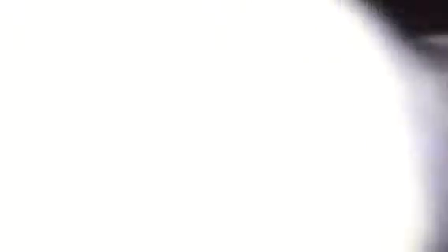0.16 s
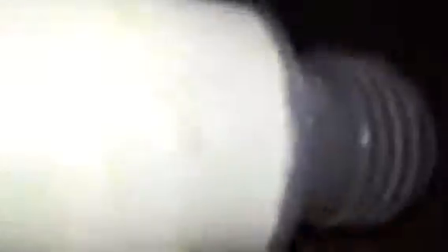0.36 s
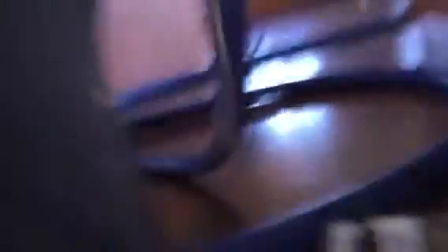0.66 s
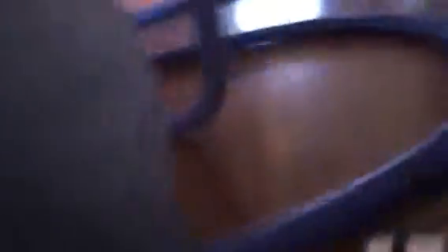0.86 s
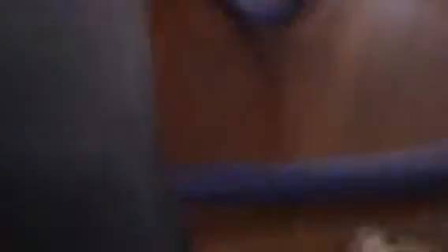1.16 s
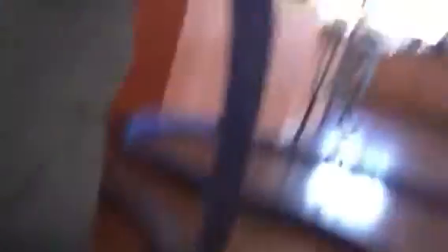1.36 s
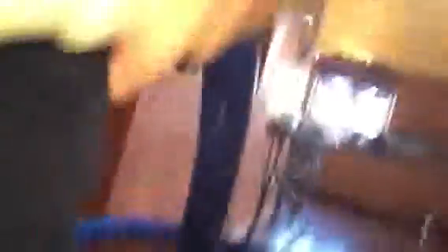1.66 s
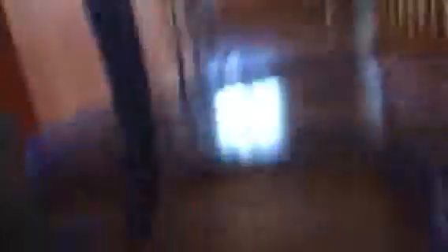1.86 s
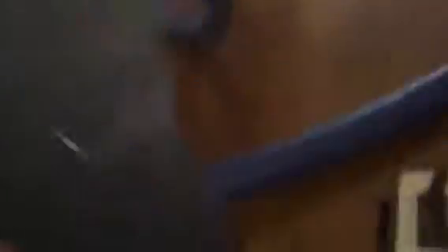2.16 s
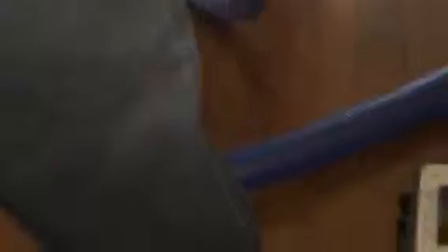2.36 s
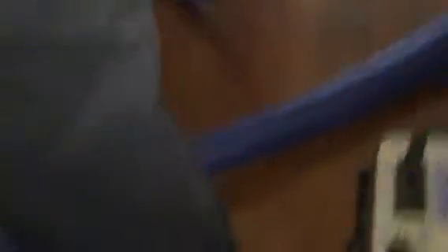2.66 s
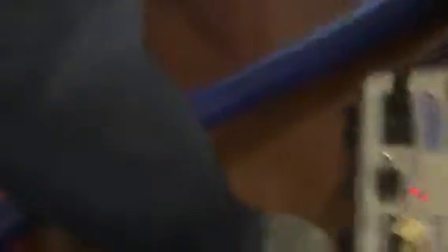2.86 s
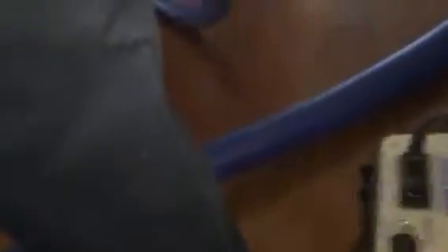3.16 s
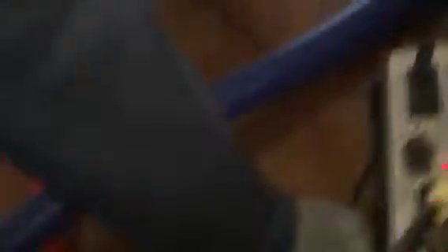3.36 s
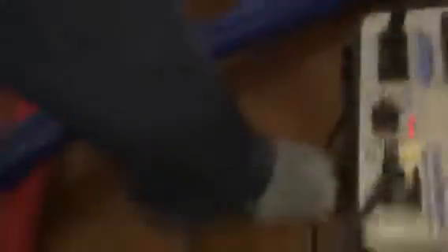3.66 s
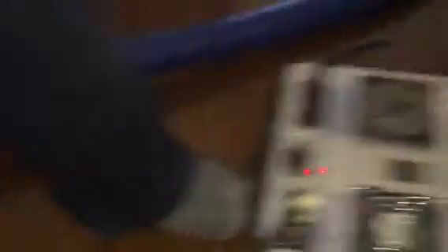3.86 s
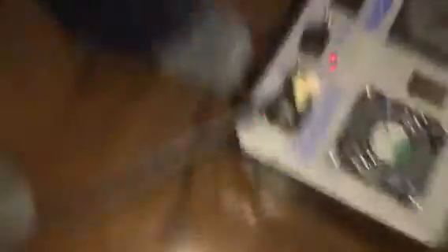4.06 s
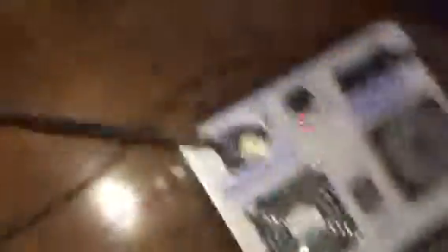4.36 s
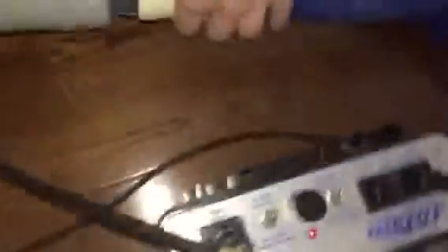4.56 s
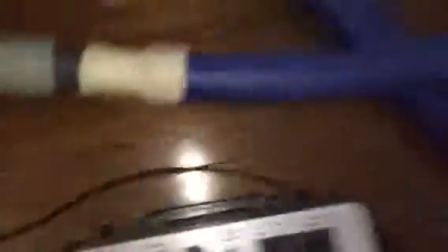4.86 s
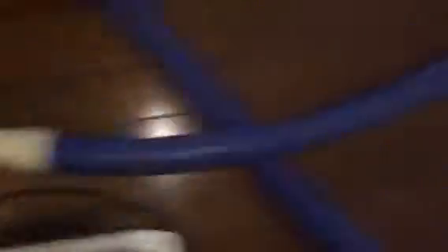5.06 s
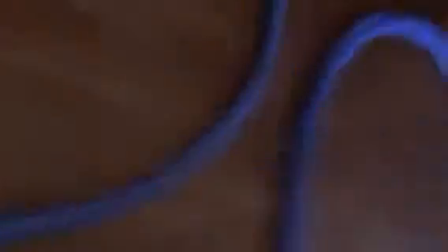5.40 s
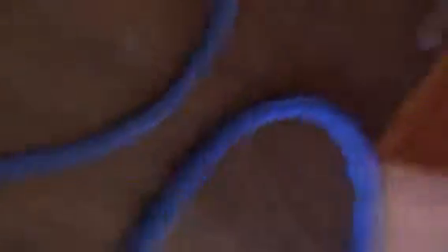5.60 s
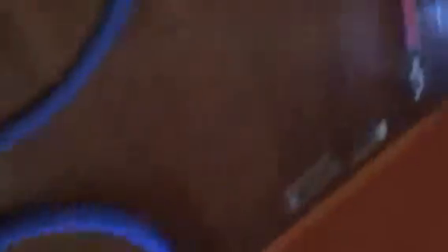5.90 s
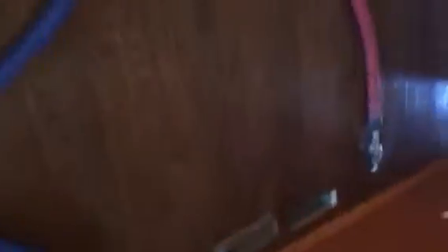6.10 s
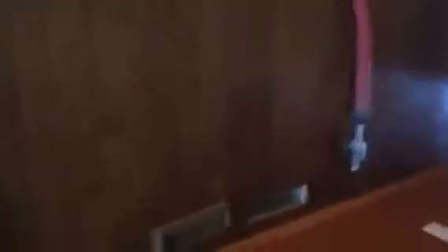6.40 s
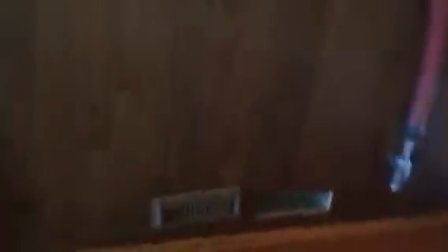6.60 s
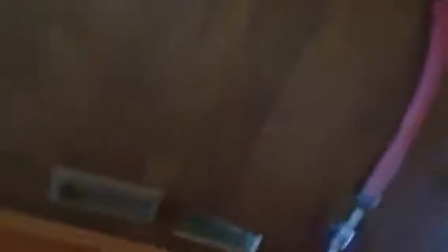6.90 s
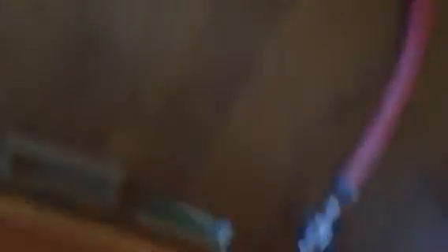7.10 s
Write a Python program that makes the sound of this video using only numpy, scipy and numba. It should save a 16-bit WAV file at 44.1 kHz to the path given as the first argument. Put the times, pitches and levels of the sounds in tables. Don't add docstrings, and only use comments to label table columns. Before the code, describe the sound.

Indoors, handheld and close: turbulent suction air swells and shifts in tone, with a soft bump before a sharp whistle and heavy clap seal the hose. The level ducks briefly, then a droning blower and duller room-wide air rush remain. A foot strikes the hollow wooden floor, a fainter step follows, and the rush grows closer and louder at a floor vent, coloured by a short reflection.

```python
import sys
import numpy as np
from scipy import signal
from scipy.fft import rfft, irfft
from scipy.io import wavfile
from scipy.ndimage import uniform_filter1d
from numba import njit

SR = 44100
rng = np.random.default_rng(int(sys.argv[2]) if len(sys.argv) > 2 else 0)


def to_wav(sig):
    pcm = np.clip(np.atleast_2d(sig), -1, 1) * 32767
    pcm = np.round(pcm).astype(np.int16)
    wavfile.write(sys.argv[1], SR, pcm.T)


def ratio(d):
    e = np.asarray(d, float) / 20
    return 10 ** e


N = 319284
TIME = np.arange(N) / SR
SHUT_S = 1.647
BEFORE_SHUT = np.arange(N) < SHUT_S * SR
AFTER_SHUT = np.arange(N) > SHUT_S * SR


def curve(table):
    s, *columns = np.transpose(table)
    return [np.interp(TIME, s, column) for column in columns]


def bump(s, length):
    return np.exp(-((TIME - s) / length) ** 2)


def walk(rate):
    k = int(SR / rate)
    held = np.repeat(rng.standard_normal(N // k + 1), k)
    return 1.3 * uniform_filter1d(uniform_filter1d(held, k), k)[:N]


def unit(x, lo_hz=20, hi_hz=20000):
    part = signal.sosfilt(signal.butter(4, [lo_hz, hi_hz], "band", fs=SR, output="sos"), x)
    return x / np.sqrt(np.mean(part ** 2))


@njit
def svf(x, hz, width):
    y, b, l = np.empty(len(x)), 0., 0.
    for i in range(len(x)):
        g, k = np.tan(np.pi * hz[i] / SR), width[i] / hz[i]
        v = (b + g * (x[i] - l)) / (1 + g * (g + k))
        b, l, y[i] = 2 * v - b, l + 2 * g * v, k * v
    return y


def band(x, hz, width):
    return svf(x, hz + np.zeros(N), width + np.zeros(N))


def steep_noise(hz, width):
    return unit(band(band(rng.standard_normal(N), hz, width), hz, width))


def air(colour, treble_db=0, body_db=0, flicker_db=.5):
    hz = np.fft.rfftfreq(N, 1 / SR) + 1
    points_hz, points_db = np.transpose(colour)
    colour_db = np.interp(np.log(hz), np.log(points_hz), points_db)
    spectrum = rfft(rng.standard_normal(N)) * ratio(colour_db)
    out = 0
    for centre in 25 * 2 ** np.arange(0, 9.6, .5):
        window = np.cos(np.pi * np.clip(np.log2(hz / centre), -.5, .5)) ** 2
        top, low = np.clip(np.log2([centre / 4500, 2200 / centre]), 0, 1)
        level_db = flicker_db * walk(6) + top * treble_db + low * body_db
        out = out + irfft(spectrum * window, N) * ratio(level_db)
    return out


def echo(x, ms, strength, top_hz=9000):
    dull = signal.sosfiltfilt(signal.butter(2, top_hz, fs=SR, output="sos"), x)
    late = np.interp(np.abs(np.arange(N) - ms * SR / 1000), np.arange(N), dull)
    return (x + strength * late) / np.sqrt(1 + strength ** 2)


def duck():
    duck_db, step_db, hold_until_s, recover_s = -8, 5, 1.845, 0.11
    creep = (duck_db + step_db) * np.exp(-np.clip(TIME - hold_until_s, 0, None) / recover_s)
    db = np.where(TIME < hold_until_s, duck_db, creep) * (TIME > SHUT_S)
    return uniform_filter1d(db, size=1300)


# time in seconds, level in dB, treble won or lost by the aim in dB.
HOSE_LEVEL = [(0, -27.5, 0.5), (.2, -26.5, -1.5), (.4, -27, 2.5), (.6, -25, 0), (.8, -25, 1),
              (.92, -22, 0.5), (1.15, -24, -.5), (1.5, -25, 0), (1.55, -24.5, -7)]
# pitch in Hz, strength in dB per Hz.
HOSE_COLOUR = [(240, -28), (400, -14.5), (783, -13), (1470, -6), (1730, -2), (2080, -3), (2460, -2),
               (3240, -2), (4200, 0), (4900, -8.5), (6650, -2.5), (9020, -5), (10500, -7.5), (14500, -4),
               (15400, -4.5)]
# time in seconds, pitch in Hz, level in dB.
RIM = [(0, 6250, -28), (.1, 7600, -28.5), (.22, 9400, -26), (.32, 8000, -32), (.42, 6060, -24.5),
       (.5, 5860, -30), (.6, 5500, -52)]
# time in seconds, echo delay in ms, echo strength from 0 to 1.
HAND = [(0, .54, .72), (.15, .49, .62), (.3, .45, .62), (.4, .5, .68), (.5, 0.52, .4), (.62, 0.36, .1),
        (1.12, 0.42, 0.12), (1.4, .43, .3), (1.6, 0.3, 0.13)]
# pitch in Hz, width in Hz, lift as a share.
MOUTH = [(1800, 180, 0.2), (2400, 180, 0.42), (4310, 230, 0.65), (5680, 310, 0.3)]


def hose():
    db, aim_db = curve(HOSE_LEVEL)
    ms, hand = curve(HAND)
    body_db = 8.5 - 1.26 * (db - db[0])
    body_db = body_db + 7.5 * bump(SHUT_S, 0.11)
    body_db = body_db - 12 * AFTER_SHUT
    treble_db = aim_db + 0.74 * walk(6.45)
    rush = unit(air(HOSE_COLOUR, treble_db, body_db), 1350, 4930) * ratio(db)
    rush = echo(rush, ms, np.clip(hand, 0, 1), top_hz=4500)
    rush = rush + sum(lift * band(rush, hz, width) for hz, width, lift in MOUTH)
    rush = rush - np.clip(0.95 * hand, 0, 1) * band(rush, 616, 370)
    rim_hz, rim_db = curve(RIM)
    glint = unit(band(rng.standard_normal(N), rim_hz, 900))
    rush = rush + glint * ratio(rim_db) * (rim_db > rim_db[-1])
    after = np.clip(TIME - SHUT_S, 0, None)
    t60_s = 0.082
    return rush * ratio(-7.5 * (after > 0) - 60 * after / t60_s)


# time in seconds, level in dB.
RUMBLE_LEVEL = [(0, -39.5), (.38, -37), (1, -42), (1.43, -37.5), (1.93, -43.5), (2.44, -41.5), (2.92, -44),
                (4.3, -40), (5.36, -45), (5.7, -49.5), (7.24, -49.5)]
# pitch in Hz, strength in dB per Hz.
RUMBLE_COLOUR = [(15, -66), (25, -36), (35, -57), (45, -9), (92, -2), (108, -0.5), (134, -4), (184, -5),
                 (214, -3.5), (265, -1), (332, -10), (420, -8.5), (550, -26.5), (920, -120)]
# pitch in Hz, rms level in dB, wander in Hz.
BLOWER_TONES = [
    (270.5, -52, 2.15),
    (1016, -55, 2.4),
]


def blower():
    db, = curve(RUMBLE_LEVEL)
    tones = 0
    for hz, tone_db, wander_hz in BLOWER_TONES:
        hidden_db = -6 * (hz > 500) * BEFORE_SHUT
        level = ratio(tone_db + 2.2 * walk(8) + hidden_db)
        phase = 2 * np.pi * np.cumsum(hz + wander_hz * walk(14)) / SR
        tones = tones + level * np.sin(phase)
    near = ratio(0.57 * (db - db[3 * SR]))
    rumble = unit(air(RUMBLE_COLOUR, flicker_db=0.7)) * ratio(db + 1.5)
    return (rumble + np.sqrt(2) * tones * near) * ratio(0.68 + 0.53 * duck())


# time in seconds, level in dB, treble won or lost by the aim in dB.
RUSH_LEVEL = [(2, -33.5, -0.5), (2.7, -33, 0.5), (3, -33.5, 1), (3.7, -33.5, 1), (4.35, -33.5, 1),
              (4.65, -34.5, 0), (4.9, -33, -2), (5.25, -31.8, -1.5), (5.5, -29.8, -1.5), (5.7, -30.5, -1),
              (5.9, -29, -.5), (6.3, -29.5, 2), (6.9, -29, 2.5), (7.24, -26.5, 1)]
# pitch in Hz, strength in dB per Hz.
ROOM_COLOUR = [(180, -35), (300, -23), (476, -13), (640, -3), (743, -8.5), (1050, -5.5), (1200, -8),
               (1580, -6), (2280, -4), (2470, -6.5), (4470, -5.5), (5020, -8), (5640, -5.5), (13500, -16),
               (15400, -18.5)]
# pitch in Hz, strength in dB per Hz.
VENT_COLOUR = [(180, -56), (300, -64), (424, -30), (453, -30), (484, -17.5), (580, -13), (662, -8.5),
               (935, -2.5), (1440, -6), (1900, -4.5), (5020, -7), (6760, -4.5), (15400, -16)]
# time in seconds, vent share from 0 to 1, floor echo delay in ms, echo strength from 0 to 1.
APPROACH = [(4.5, .01, 1.8, 0.3), (4.95, .3, 1.3, 0.26), (5.3, 0.8, 1.12, 0.3), (6.0, 0.94, 1.02, 0.22),
            (6.85, 0.97, 1.04, 0.3), (7.0, 0.97, 1.015, .36), (7.24, 0.96, 0.91, 0.36)]


def room_and_vent():
    db, facing_db = curve(RUSH_LEVEL)
    duck_db = duck()
    treble_db = facing_db + 0.41 * duck_db
    body_db = 0.53 * facing_db - 0.11 * duck_db
    share, ms, strength = curve(APPROACH)
    share = np.clip(share, 0, 1)
    room = unit(air(ROOM_COLOUR, treble_db + .6, body_db + .8), 720, 6300)
    vent = unit(air(VENT_COLOUR, treble_db - 1.0, body_db - 2.0), 700, 6600)
    vent = echo(vent, ms, np.clip(strength, 0, 1), top_hz=10700)
    mix = np.sqrt(1 - share) * room + np.sqrt(share) * vent
    return mix * ratio(db + duck_db - 11 * BEFORE_SHUT)


# echo delay in ms, strength from 0 to 1, drift in ms.
NEARBY = [(2.1, 0.12, 0.28), (3.7, 0.1, 0.312), (5.9, 0.17, 0.386)]


def nearby(x):
    for ms, strength, drift_ms in NEARBY:
        x = echo(x, ms + drift_ms * walk(1.5), strength, top_hz=12200)
    return x


# time in seconds, length in seconds,
# extra depth of the lower dip, extra depth of the upper dip, pitch of the lower dip in Hz.
TURNS = [(.205, .035, .6, .3, 4880), (.24, 0.12, .2, .3, 4950), (.275, .04, .15, .35, 5000),
         (.38, .04, .3, -.1, 5250), (.58, .08, 0.11, 0.12, 5000), (1.298, 0.055, .65, .1, 4900),
         (1.45, .12, .15, 0.38, 5150)]
# pitch in Hz, width in Hz, depth from 0 to 1.
MIDDLE_DIP = (7550, 800, 0.32)


def shadow(x):
    usual_hz = 5020
    dip_hz, dip, upper_dip = usual_hz, 0.25, 0.35
    for s, length, lower, upper, hz in TURNS:
        away = bump(s, length)
        dip_hz = dip_hz + (hz - usual_hz) * away
        dip = dip + lower * away
        upper_dip = upper_dip + upper * away
    for _ in range(2):
        x = x - np.clip(dip, 0, 1) ** 1.25 * band(x, dip_hz, 310)
        x = x - np.clip(upper_dip, 0, 1) ** 1.35 * band(x, 10460, 1000)
    hz, width, depth = MIDDLE_DIP
    return x - depth * band(x, hz, width)


# time in seconds, level in dB, pitch in Hz, time to fade by 60 dB in seconds.
KNOCKS = [
    (1.262, -24, 227, 0.18),
    (1.653, -15.5, 82, 0.16),
    (4.349, -29, 170, 0.64),
    (4.372, -26.5, 125, 0.7),
    (5.455, -31, 103, 0.47),
    (7.12, -38, 48, .25),
]
# time in seconds, level in dB, pitch in Hz.
TICKS = [
    (1.653, -19, 248),
    (4.348, -20.5, 1750),
    (4.349, -28, 500),
    (5.455, -36, 400),
]


def knocks():
    out, t = np.zeros(N + SR), np.arange(SR) / SR
    for s, db, hz, t60 in KNOCKS:
        start = int(s * SR)
        sag = np.sin(2 * np.pi * hz * (t + 0.0101 * (1 - np.exp(-t / 0.014))))
        rough = steep_noise(hz, 0.78 * hz)[:SR] * (1 - np.exp(-t / 0.0056))
        boom = sag * ratio(-90 * t / t60) + 0.58 * rough
        out[start:start + SR] += boom * ratio(db - 60 * t / t60)
    for s, db, hz in TICKS:
        start = int(s * SR)
        out[start:start + SR] += steep_noise(hz, 0.6 * hz)[:SR] * ratio(db - 60 * t / 0.035)
    return out[:N]


# time in seconds, pitch in Hz, jet level in dB.
GAP = [(1.48, 2300, -43), (1.55, 2010, -24.5), (1.6, 1930, -18), (1.636, 3140, -18), (1.643, 4030, -9.5),
       (1.649, 4070, -22), (1.676, 4200, -29), (1.69, 4190, -43), (1.8, 4150, -64)]


def gap():
    step_hz, upper_db, q = 1350, -3, 4.2
    hz, spit_db = curve(GAP)
    squeal_db = 5 * bump(1.643, 0.0033)
    db = spit_db + squeal_db - 6 * AFTER_SHUT
    jet = rng.standard_normal(N)
    low, high = (unit(band(band(jet, f, f / q), f, f / q)) for f in (hz, hz + step_hz))
    spit = unit(band(rng.standard_normal(N), 1.3 * hz, 9000)) * ratio(spit_db)
    song = (low + ratio(upper_db) * high) * ratio(db)
    return (song + spit) * (TIME > GAP[0][0]) * (TIME < GAP[-1][0])


# pitch in Hz, width in Hz, level in dB, loudest at and lasting, in seconds.
LEAK = (5620, 170, -47, 2.45, .7)


def leak():
    hz, width, db, s, length = LEAK
    return steep_noise(hz, width) * ratio(db + 1.5 * walk(6)) * bump(s, length)


def scene():
    mono = shadow(nearby(hose() + room_and_vent())) + gap() + leak() + blower() + knocks()
    return np.array([mono, mono])


def spectral_holes(x):
    top_hz = 15290
    window = np.sin(np.pi * (np.arange(2048) + .5) / 2048)
    hz, _, z = signal.stft(x, SR, window, nperseg=2048, noverlap=1024)
    cell = uniform_filter1d(np.abs(z) ** 2, size=7, axis=0)
    mask = uniform_filter1d(cell, size=90, axis=0)
    limit_db = -6.9 + 4.0 * np.log2((hz + 1) / 10000)
    quiet_db = np.clip(10 * np.log10(np.median(mask) / (mask + 1e-20)), 0, 10)
    heard = cell > mask * ratio(2 * (limit_db[:, None] + .25 * quiet_db))
    keep = heard | (hz < 4400)[:, None]
    z = z * keep * (hz < top_hz)[:, None]
    return signal.istft(z, SR, window, nperseg=2048, noverlap=1024)[1][:N]


def fills(mono):
    fill_s, fills_per_s = .046, 3.5
    low_hz, high_hz, width_hz = 4020, 13000, 1870
    side, size = np.zeros(N), int(fill_s * SR)
    hz = np.fft.rfftfreq(size, 1 / SR)
    fade = np.sin(np.pi * np.arange(size) / size) ** 2
    for when, where, wide in rng.random((int(fills_per_s * N / SR), 3)):
        s = fill_s + when * (N / SR - 2 * fill_s)
        lo_hz = low_hz + where * (high_hz - low_hz)
        if abs(s - SHUT_S) < 3 * fill_s:
            continue
        hi_hz = lo_hz + width_hz * (0.59 + .8 * wide)
        start = int(s * SR) - size // 2
        part = slice(start, start + size)
        turned = rfft(mono[part]) * np.exp(2j * np.pi * rng.random(len(hz)))
        turned = turned * (hz > lo_hz) * (hz < hi_hz)
        side[part] += irfft(turned, size) * fade * ratio(-4.5)
    return np.array([side, -side])


def band_limit(x):
    return signal.sosfilt(signal.butter(12, 16470, fs=SR, output="sos"), x)


def record(dry):
    x = np.tanh(1.288 * dry[0]) / 1.314
    x = signal.sosfilt(signal.butter(2, 38, "high", fs=SR, output="sos"), x)
    x = spectral_holes(x)
    return band_limit(x + fills(x))


dry = scene()
out = record(dry)
to_wav(out)
```